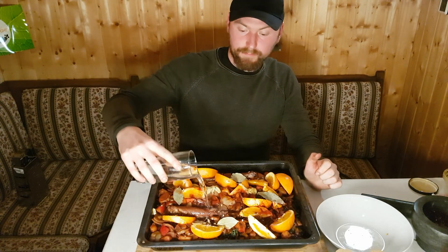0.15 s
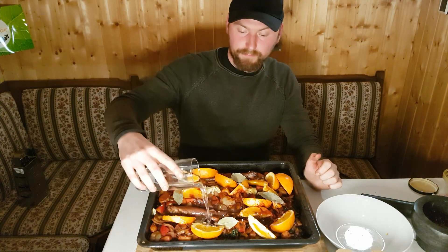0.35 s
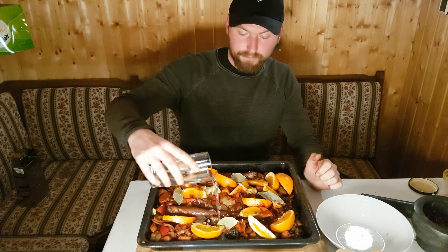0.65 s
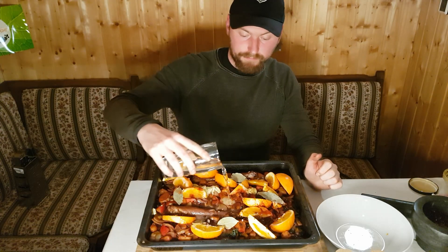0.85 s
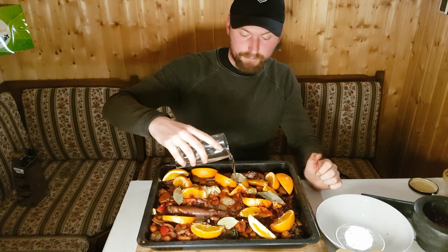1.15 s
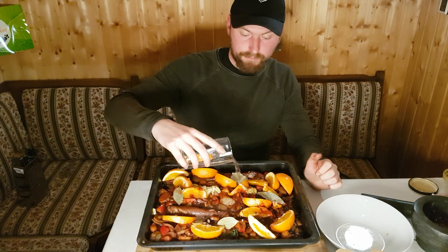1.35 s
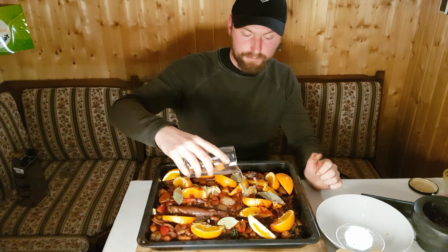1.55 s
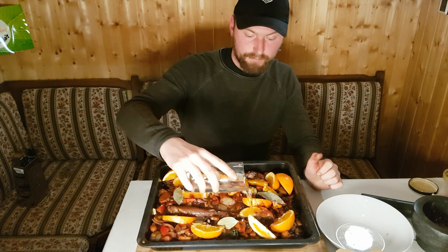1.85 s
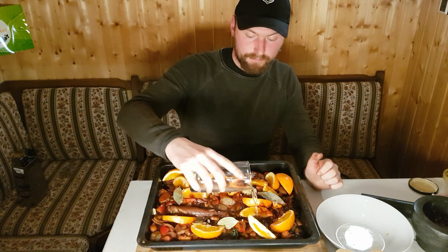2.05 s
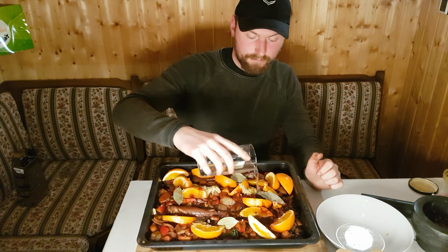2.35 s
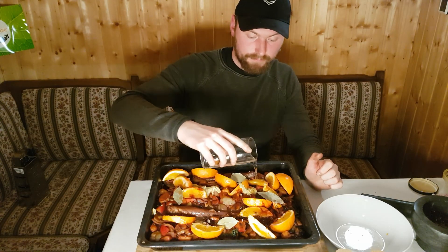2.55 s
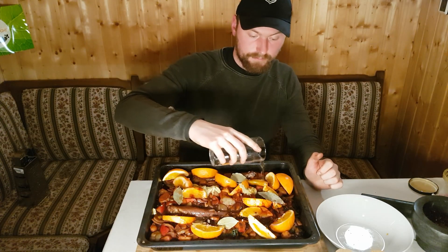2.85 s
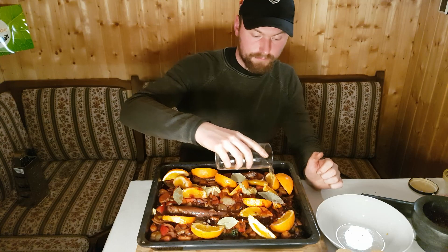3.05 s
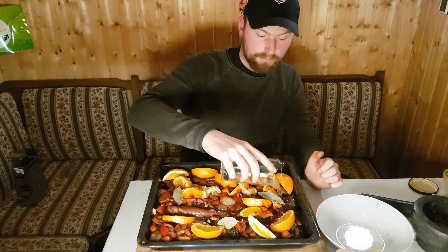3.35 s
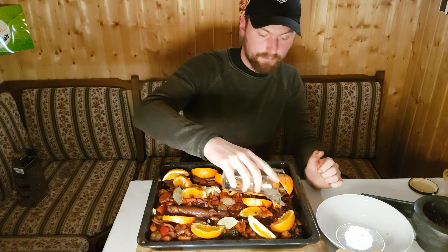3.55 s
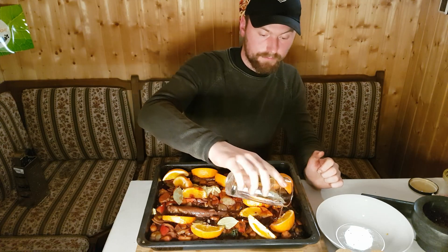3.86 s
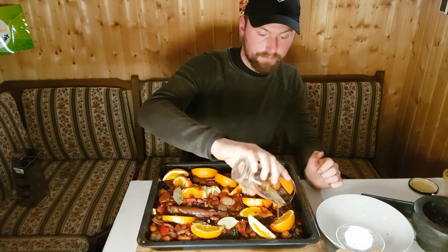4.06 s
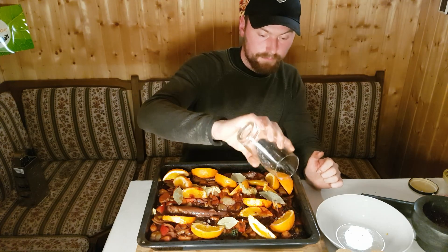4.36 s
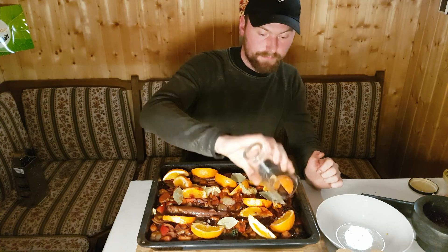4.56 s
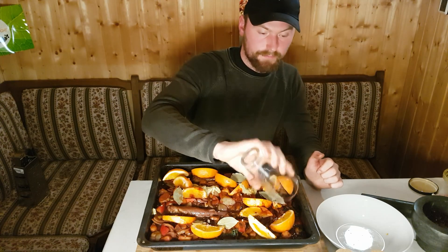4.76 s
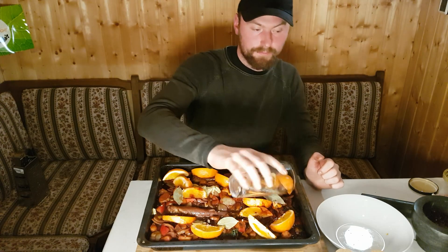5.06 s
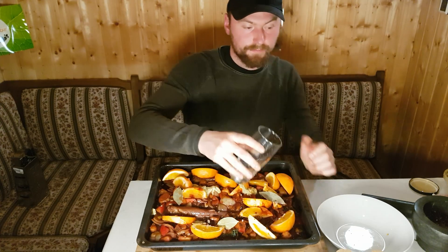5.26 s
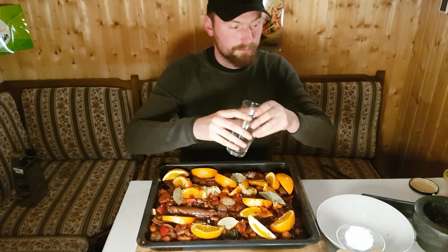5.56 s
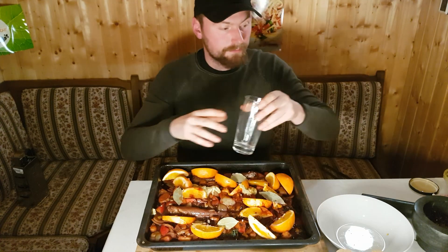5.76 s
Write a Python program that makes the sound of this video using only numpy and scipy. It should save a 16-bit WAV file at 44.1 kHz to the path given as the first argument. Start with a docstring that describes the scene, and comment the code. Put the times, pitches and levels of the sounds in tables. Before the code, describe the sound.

A thin, uneven pour of water bubbles and drips into a tray of food, with occasional hollow knocks and low room rumble.

```python
"""Water poured into a tray

In a small panelled room, water trickles from a glass onto food in a deep tray: bubbles ping, droplets
tick. Now and then something wooden knocks nearby, out of sight, and the floor thuds. Behind it the house
rumbles in the room's low resonances, a hum swells twice and the microphone hisses faintly."""
import sys
import numpy as np
from scipy import signal
from scipy.fft import rfft, irfft, next_fast_len
from scipy.io import wavfile

SR = 44100
rng = np.random.default_rng(int(sys.argv[2]) if len(sys.argv) > 2 else 0)


def generate_wav(signal):
    """Clip the signal to [-1, 1] and save it as 16-bit WAV at the path in sys.argv[1]."""
    frames = np.transpose(np.atleast_2d(signal))
    scaled = np.clip(frames, -1, 1) * 32767
    pcm = np.round(scaled).astype(np.int16)
    wavfile.write(sys.argv[1], SR, pcm)


N = 260178

POUR_END_S = 3.9
# Spurts of the stream and the tone of their small bubbles: start_s, length_s, gain_db, tilt_db_per_octave
SPURTS = [(0.0, 0.0067, -43.5, 2.5), (0.09, 0.43, -61, 0.8), (0.529, 0.23, -55, -2.5),
          (0.793, 0.28, -77, 2), (0.967, 0.12, -65, -1.5), (1.104, 0.12, -63, -4), (1.4, 0.094, -60, -1),
          (1.572, 0.23, -64, -2), (1.893, .24, -57, 0.2), (2.302, 0.35, -65, -2), (2.68, 0.17, -65.5, -1.8),
          (2.934, 0.24, -67, 1.5), (3.192, 0.21, -65.5, -3.5), (3.615, 0.075, -74.5, -5.5)]


def water():
    """The pour, heard in the room: clear bubbles and droplets over a patter that follows the stream."""
    flow = stream()
    return room(bubbles() + flow * patter() + droplets(flow), wet_db=-3)


def stream():
    """Gain of the pour: each spurt rises fast, sags and stops short, over a dribble that dries up."""
    attack_s, sag_db_per_s, release_s = 0.022, 31, 0.019
    dribble_db, drying_db_per_s = -64.5, 4.5
    t = np.arange(N) / SR
    gain = amp(dribble_db - drying_db_per_s * t)
    for start, length, db, _ in SPURTS:
        since = np.clip(t - start, 0, None)
        attack = np.minimum(since / attack_s, 1)
        release = np.exp(-np.clip(since - length, 0, None) / release_s)
        gain += attack * release * amp(db - sag_db_per_s * since)
    return gain * (t < POUR_END_S)


def bubbles():
    """Each drop lands with a short splat, and its bubble rings on after it."""
    # The clearest bubbles: start_s, peak_db, pitch_hz
    clearest = [(0.0053, -29, 3500), (0.0237, -34.5, 8150), (0.0266, -33, 4560), (0.0582, -46, 8800),
                (0.1098, -39.5, 4260), (0.1373, -47, 8180), (0.151, -42, 2460), (0.1617, -43, 6900),
                (0.1895, -31.5, 3970), (0.2177, -39, 2760), (0.2464, -26.5, 7950), (0.2782, -36, 6500),
                (0.291, -41, 5070), (0.3166, -44, 6950), (0.353, -36.5, 3760), (0.369, -40.5, 4500),
                (0.4077, -44.5, 4740), (0.4328, -44, 3170), (0.53, -40, 3550), (0.565, -40, 4460),
                (0.5986, -40.5, 8800), (0.63, -39.5, 5470), (0.6555, -38.5, 2770), (0.6783, -36, 7240),
                (0.7673, -54, 3880), (0.7759, -37.5, 3860), (0.8517, -42, 4680), (1.0043, -42, 8600),
                (1.018, -44.5, 2530), (1.128, -42, 3650), (1.1317, -42.5, 2880), (1.1787, -44.5, 2200),
                (1.217, -40.5, 6650), (1.3983, -41, 4730), (1.4549, -38, 2520), (1.5765, -39, 3450),
                (1.6126, -45, 2900), (1.6598, -36, 2400), (1.7508, -32, 3720), (1.7505, -34, 2520),
                (1.911, -46, 4060), (1.924, -38.5, 5020), (1.934, -45, 2260), (1.9558, -41, 6070),
                (1.979, -39, 2720), (1.9887, -38, 5200), (2.0433, -47.5, 1380), (2.044, -38, 2710),
                (2.047, -38, 6140), (2.05, -41, 7400), (2.1, -42.5, 9700), (2.0987, -42.5, 5900),
                (2.115, -42.5, 4220), (2.2707, -48, 5560), (2.3395, -50, 6900), (2.38, -45.5, 9250),
                (2.527, -47, 5080), (2.573, -47, 8500), (2.6917, -45.5, 2610), (2.7, -43.5, 5300),
                (2.7327, -35, 3730), (2.9576, -51, 8600), (3.19, -46.5, 2970), (3.225, -49.5, 2900),
                (3.268, -47, 5640), (3.2908, -41, 8130), (3.297, -46.5, 4440), (3.3937, -52, 2230),
                (3.7, -47.5, 9700)]
    start, db, hz = np.transpose(clearest)
    ring_spread, splat_spread = rng.standard_normal((len(start), 2)).T
    ring_cycles = 3.8 * (hz / 4000) ** 0.5 * np.exp(0.15 * ring_spread)
    rings = pings(start, db, hz, ring_cycles, rise=0.006)
    splat_hz = hz * np.exp(0.18 * splat_spread)
    splats = pings(start, db - 0.3, splat_hz, cycles=np.full(len(start), 0.8), rise=0.011)
    return rings + splats


def patter():
    """Thousands of small bubbles ring at random, brighter or duller with each spurt."""
    # Strength of small bubbles by pitch: pitch_hz, level_db
    spray = [(1500, -15), (2200, -1.5), (4000, 3.5), (6000, 4.5), (8500, 7), (11000, 0)]
    when, pitch, size, ring = rng.random((3000, 4)).T
    start = when * POUR_END_S
    hz = 1300 * 9.26 ** pitch
    db = np.minimum(-4.5 * np.log(size), 12) + along(spray, hz)  # many faint, few loud
    spurt_start, _, _, tilt = np.transpose(SPURTS)
    db += tilt[np.searchsorted(spurt_start, start) - 1] * np.log2(hz / 4000)
    return unit(pings(start, db, hz, cycles=1.4 + 7.3 * ring ** 2, rise=0.023))


def pings(start, db, hz, cycles, rise):
    """Damped sines that swell in about a cycle and glide up as each bubble nears the surface."""
    t = np.arange(512) / SR
    turns, life = hz[:, None] * t, cycles[:, None]
    envelope = np.exp(-turns / life) * (1 - np.exp(-turns / 1.15))
    wave = envelope * np.sin(2 * np.pi * turns * (1 + rise * turns / life))
    wave *= amp(db)[:, None] / np.abs(wave).max(axis=1, keepdims=True)
    at = np.round(start * SR).astype(int)[:, None] + np.arange(len(t))
    return np.bincount(at.ravel(), wave.ravel(), N + SR)[:N]


def droplets(flow):
    """Droplets burst with bright ticks; a prickle of lesser ones follows the flow."""
    # Distinct bursts: start_s, peak_db
    bursts = [(0.0044, -26.5), (0.134, -38), (0.245, -43), (0.278, -40), (0.341, -38), (0.3693, -41),
              (0.431, -42), (0.848, -33), (0.9063, -43.5), (1.3967, -46), (1.6561, -43), (1.9075, -44),
              (1.9654, -36), (2.0438, -38), (2.303, -44), (2.526, -48), (2.605, -39.5), (2.755, -40),
              (3.2315, -41)]
    # Spectrum of a tick: frequency_hz, density_db
    tick = [(1000, -28), (4000, -24), (8000, -3), (11500, -1), (14000, -21), (16000, -34)]
    when, size = rng.random((110, 2)).T
    prickle = struck(when * POUR_END_S, 4 + np.minimum(-4 * np.log(size), 10), causal(tick))
    return struck(*np.transpose(bursts), causal(tick)) + flow * prickle


def knocks():
    """Dull blows on hollow wood, out of sight: mostly the room's answer reaches the microphone."""
    # Blows: start_s, level_db, relative_ring_db, brightness_db_per_octave
    blows = [(0.002, -45, -4, -3), (0.976, -50, -22, -8.5), (1.151, -59, -8, 4), (2.181, -53, -11, -15),
             (2.629, -56.5, -15, -10), (2.83, -62.5, -2, -4), (3.027, -35, -2, 1.5),
             (4.753, -38.5, 4.5, 1.5), (5.126, -45, -8, -7), (5.224, -53.5, 9.5, 4), (5.77, -49, 1.5, -2.5)]
    # Spectrum of a blow: frequency_hz, density_db
    wood = [(88, -23), (150, -2), (389, 0), (521, -3), (711, -6), (799, -5.5), (1130, -4.5), (1460, -12),
            (1990, -9), (3180, -12), (4340, -20.5), (11500, -35.5), (15700, -68)]
    # Modes of the hollow wood: pitch_hz, width_hz, gain_db
    wood_modes = [(212, 22, 0.5), (398, 64, -2.5), (2140, 120, -17.5)]
    out, t = np.zeros(N + SR), np.arange(SR // 2) / SR
    build = 1 - np.exp(-t / 0.0042)  # the answer builds over the first echoes
    for start, db, _, brightness in blows:
        tilt = lambda hz: amp(brightness * np.clip(np.log2(hz / 700 + 1e-9), 0, 2.5))
        answer = filtered(tail()[:len(t)] * build, lambda hz: causal(wood)(hz) * tilt(hz))
        onset_rms = np.sqrt(np.mean(answer[:2000] ** 2))
        out[round(start * SR):][:len(t)] += amp(db) * answer / onset_rms
    start, db, ring_db, _ = np.transpose(blows)
    ring = struck(start + 0.004, db + ring_db, resonances(wood_modes))
    return out[:N] + room(ring, wet_db=6)


def thuds():
    """Soft weight on the floor: a few low cycles that swell and die."""
    # Thuds through the floor: start_s, level_db, pitch_hz
    loads = [(0.0, -33, 99), (0.04, -34, 81.5), (1.732, -36, 84), (3.056, -35, 94), (3.094, -36.5, 91),
             (4.774, -33.5, 88), (5.155, -34, 88), (5.793, -27, 87.6), (5.846, -30.5, 74), (5.873, -38, 73)]
    out, t = np.zeros(N + SR), np.arange(SR // 4) / SR
    envelope = t / 0.011 * np.exp(1 - t / 0.0096)
    for start, db, hz in loads:
        out[round(start * SR):][:len(t)] += amp(db) * envelope * np.sin(2 * np.pi * hz * t)
    return out[:N]


def rumble():
    """The house rumbles in the room's resonances: a deep boom with a drone above it."""
    # Course of the rumble: time_s, boom_db, drone_db
    levels = [(0.1, -44.5, -45), (0.28, -48.5, -49), (0.84, -46, -48.5), (1.08, -49, -52),
              (1.41, -50, -50.5), (1.76, -50, -51.5), (2.02, -52, -49), (2.51, -50.5, -46.5),
              (3.25, -53.5, -56.5), (4.23, -53.5, -55.5), (4.56, -54.5, -56), (4.93, -51, -54.5),
              (5.27, -51, -59), (5.9, -51.5, -52)]
    # Lowest room resonances: pitch_hz, width_hz, gain_db
    boom_modes = [(61.1, 20.2, -10.5), (88, 11.5, -6.5), (116.7, 15.4, -9.5)]
    # Higher room resonances: pitch_hz, width_hz, gain_db
    drone_modes = [(140, 24, -3.5), (190.1, 11.5, 3), (235, 17.5, 4), (356, 88, -12.5), (437, 20.5, -13.5)]
    boom_db, drone_db = curves(levels)
    boom = noise(lambda hz: resonances(boom_modes)(hz) * hz ** 2 / (hz ** 2 + 45 ** 2))  # 45 Hz low cut
    drone = noise(resonances(drone_modes))
    return amp(boom_db) * boom + amp(drone_db) * drone


def hum():
    """A low, slightly wavering hum that swells quickly and fades steadily."""
    # Swells of the hum: start_s, level_db
    swells = [(4.78, -44), (5.25, -42)]
    pitch_hz, rise_s, fade_db_per_s = 88, 0.034, 36
    t, gain = np.arange(N) / SR, np.zeros(N)
    for start, db in swells:
        since = np.clip(t - start, 0, None)
        gain += np.minimum(since / rise_s, 1) * amp(db - fade_db_per_s * since)
    waver = 0.5 * noise(lambda hz: hz < 8)
    return gain * unit(np.sin(2 * np.pi * pitch_hz * t + waver))


def air():
    """The hush of the room settles; above it lies the steady hiss of the microphone."""
    # Spectrum of hush and hiss: frequency_hz, density_db
    spectrum = [(190, -43), (330, -3.5), (572, -9.5), (815, -10.5), (928, -11.5), (1350, -20), (1460, -32),
                (2530, -29.5), (4100, -32.5), (4450, -34.5), (4980, -34), (8760, -37), (15700, -53)]
    # Course of the hush: time_s, level_db
    hush_levels = [(0.0, -54.5), (1.53, -61), (5.9, -61.5)]
    split_hz, hiss_db = 1600, -69.5
    hush = noise(lambda hz: amp(along(spectrum, hz)) * (hz < split_hz))
    hiss = noise(lambda hz: amp(along(spectrum, hz)) * (hz >= split_hz))
    return amp(curves(hush_levels)[0]) * hush + amp(hiss_db) * hiss


def room(x, wet_db):
    """Direct sound, first echoes and a tail drawn anew every quarter second, as for a moving source."""
    # First echoes off the panelled walls: delay_s, gain_db
    walls = [(.0042, -5.5), (.0075, -21), (0.0109, -18), (0.0138, -21)]
    out = np.pad(x, (0, SR))
    for delay, db in walls:
        out[round(delay * SR):][:N] += amp(db) * x
    step, predelay = SR // 4, 200
    for at in range(0, N, step):
        wet = signal.fftconvolve(x[at:at + step], tail())
        out[at + predelay:][:len(wet)] += amp(wet_db) * wet
    return out[:N]


def tail():
    """A diffuse decay of energy 1; each frequency dies at its own speed, and the end falls faster."""
    # Reverberation of the small room: frequency_hz, t60_s
    decay_times = [(200, 0.24), (1000, 0.22), (4000, 0.16), (12000, 0.17)]
    hz, t, spectra = signal.stft(rng.standard_normal(SR // 2), SR, nperseg=256)
    decay_db = -60 * t / along(decay_times, hz)[:, None] - 3 * (t / 0.18) ** 3
    out = signal.istft(spectra * amp(decay_db), SR, nperseg=256)[1]
    return out / np.linalg.norm(out)


def amp(db):
    """Decibels to amplitude."""
    return 10 ** (np.asarray(db) / 20)


def unit(x):
    """x scaled to an RMS of 1."""
    return x / np.sqrt(np.mean(x ** 2) + 1e-20)


def along(points, hz):
    """Interpolate (frequency_hz, value) points on a log axis."""
    f, value = np.transpose(points)
    return np.interp(np.log(hz + 1), np.log(f + 1), value)


def curves(rows):
    """One value per sample for each column after the time."""
    times, *columns = np.transpose(rows)
    return [np.interp(np.arange(N) / SR, times, column) for column in columns]


def filtered(x, response):
    """x through a complex response of frequency."""
    size = next_fast_len(len(x) + SR // 2)
    return irfft(rfft(x, size) * response(np.fft.rfftfreq(size, 1 / SR)), size)[:len(x)]


def noise(response):
    """White noise through a response, at an RMS of 1."""
    return unit(filtered(rng.standard_normal(N), response))


def struck(start, db, response):
    """Impulses through a response, each peaking at its dB."""
    impulses = np.bincount(np.round(start * SR).astype(int), amp(db), N)[:N]
    peak = np.abs(filtered(np.arange(SR) == 0, response)).max()
    return filtered(impulses, response) / peak


def resonances(modes):
    """Causal response of (pitch_hz, width_hz, gain_db) modes of alternating sign."""
    return lambda hz: sum((-1) ** k * amp(db) * 1j * hz * width / (pitch ** 2 - hz ** 2 + 1j * hz * width)
                          for k, (pitch, width, db) in enumerate(modes))


def causal(points):
    """Minimum-phase response with the given (frequency_hz, gain_db) spectrum."""
    def response(hz):
        cepstrum = irfft(np.log(amp(along(points, hz)) + 1e-6))
        half = len(cepstrum) // 2
        cepstrum[1:half] *= 2
        cepstrum[half + 1:] = 0
        return np.exp(rfft(cepstrum))
    return response


def scene():
    """The pour, the knocks and the thuds over the background of the house, in mono."""
    return (water() + knocks() + thuds() + rumble() + air() + hum())[None]


def record(dry):
    """The table top partly cancels a band at the microphone; nothing is kept above the band limit."""
    notch_hz, width_hz, depth, top_hz = 1520, 350, 0.52, 15827
    notch = lambda hz: 1 - depth * resonances([(notch_hz, width_hz, 0)])(hz)
    return filtered(dry[0], lambda hz: notch(hz) * (hz < top_hz))[None]


dry = scene()
out = record(dry)
generate_wav(out)
```